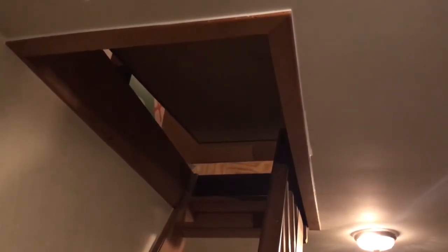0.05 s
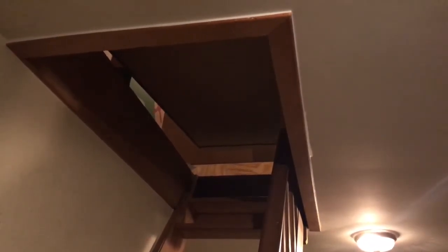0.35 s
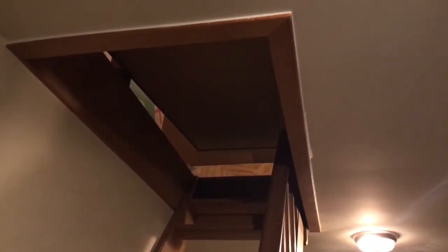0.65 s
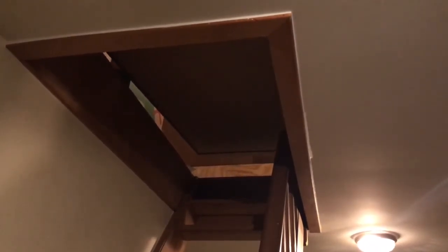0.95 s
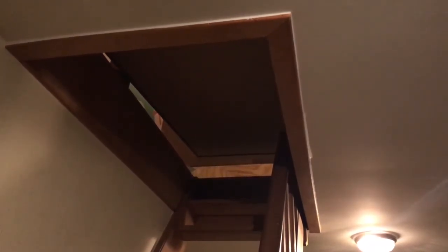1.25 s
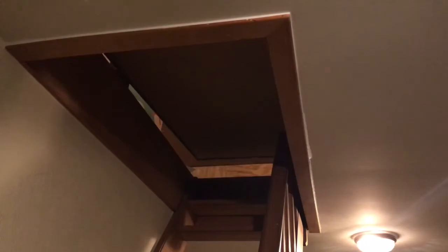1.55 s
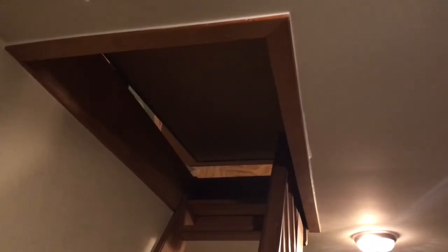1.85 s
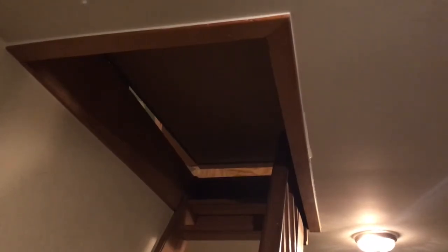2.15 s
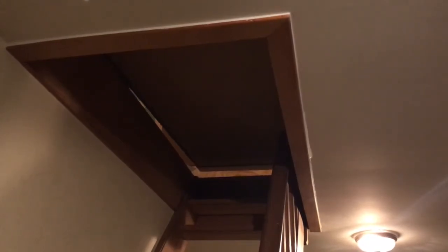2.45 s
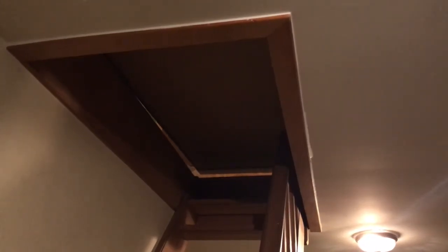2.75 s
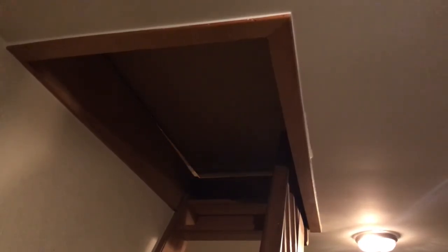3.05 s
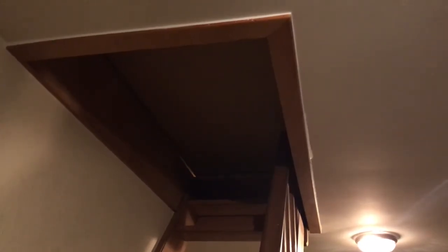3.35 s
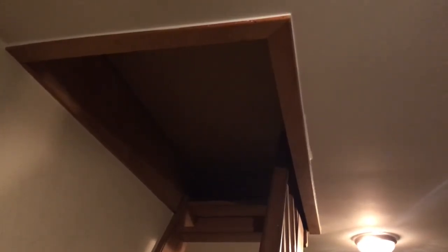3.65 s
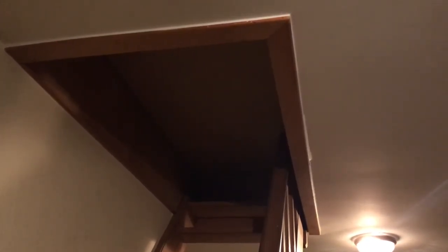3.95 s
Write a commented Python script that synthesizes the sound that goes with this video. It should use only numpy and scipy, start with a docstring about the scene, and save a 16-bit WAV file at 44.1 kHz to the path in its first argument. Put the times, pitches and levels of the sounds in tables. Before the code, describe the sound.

A winch motor hums low with a gear whine throughout, lowering a wooden attic hatch above a small, bare landing. Dry, slightly metallic ticks come about twice a second, clearest at 0.2, 0.7 and 2.1 seconds, with soft rubbing and scrapes. Faint squeaks come near 0.5, 1.7 and 2.6 seconds. From about 3 seconds the winch grows quieter and its ticks duller, over steady house hiss and hum.

```python
"""A low motor hum with a gear whine, and over it a dry tick about twice a second: a winch
slowly lowering a wooden attic hatch, heard at one microphone on the small, bare landing below.
The drive rubs softly, scrapes on each turn and squeaks now and then. As the gap closes the winch
grows quieter and its ticks duller, over the steady hiss and hums of the house."""
import sys
import numpy as np
from scipy import signal
from scipy.fft import rfft, irfft
from scipy.io import wavfile

SR = 44100
rng = np.random.default_rng(int(sys.argv[2]) if len(sys.argv) > 2 else 0)


def to_wav(sig):
    """Store sig (one row per channel, or 1-D mono) as 16-bit WAV at the path in sys.argv[1].

    Samples outside -1..1 are clipped; the rate is SR.
    """
    pcm = np.clip(np.atleast_2d(sig), -1, 1) * 32767
    pcm = np.round(pcm).astype(np.int16)
    wavfile.write(sys.argv[1], SR, pcm.T)  # frames by channels


N = 176400
T = np.arange(N) / SR


def motor(hum_hz=99.9):
    """The motor overhead hums and rumbles while its gear whines; hum and octave swell separately."""
    # level curves of the hum, its octave, the gear whine and the rumble: t/s, level/dB
    hum_curve = [(0.04, -47), (0.88, -46.5), (1.22, -52), (1.39, -47.5), (1.55, -52.5), (1.65, -66),
                 (1.75, -52), (1.92, -51), (2.2, -59), (2.36, -50), (2.68, -53), (3.08, -50), (3.55, -56),
                 (3.97, -59)]
    octave_curve = [(0.03, -50), (0.26, -75.5), (0.41, -48.5), (0.62, -53), (0.73, -61), (0.99, -49.5),
                    (1.18, -55), (1.31, -64), (1.39, -49), (1.75, -63), (1.84, -52), (1.96, -56),
                    (2.2, -56.5), (2.32, -52.5), (2.6, -52.5), (2.65, -66), (3.46, -53.5), (3.75, -67),
                    (3.97, -61.5)]
    whine_curve = [(0.03, -61), (0.86, -58), (1.86, -58.5), (3.79, -64), (3.97, -67.5)]
    rumble_curve = [(0, -56.5), (1.7, -57), (2.6, -59.5), (3.4, -61), (4, -63.5)]
    # tones that swell with the whine, the hum's third harmonic among them: f/Hz, level/dB against the whine
    # curve, unsteadiness/0-1
    whine_tones = [(480.9, 1, 0.15), (499.2, -9, 0.7), (528.7, -16, 0.1), (299.8, -9, 1), (390.8, -17, 0.4)]
    # spectrum of the rumble: f/Hz, relative level/dB
    rumble_colour = [(30, -40), (60, -9), (85, -4.5), (135, -2), (175, -5.5), (230, 0.5), (310, -9),
                     (450, -14.5), (620, -17.5), (800, -31), (2000, -52.5)]
    hum = level(hum_curve) * tone(hum_hz, unsteady=.06, rate_hz=4)
    octave = level(octave_curve) * tone(2 * hum_hz, unsteady=.12, rate_hz=3)
    gear = sum(amp(db) * tone(hz, unsteady, rate_hz=8.7) for hz, db, unsteady in whine_tones)
    rumble = level(rumble_curve) * colour(rng.standard_normal(N), rumble_colour)
    return hum + octave + level(whine_curve) * gear + rumble


def ticks(direct_db=-2.5, treble_hz=8100, dulling_db_per_s=1.3, ping_decay_s=.025):
    """Each tick is a quick run of slips that builds, echoes on the landing and leaves a metallic ping."""
    # ticks: peak t/s, relative level/dB, rise/s, fall/s, ping/dB against that level
    events = [(.213, -57, .007, .0018, -6), (.675, -57.5, .007, .003, -14), (1.189, -60.3, .014, .012, -13),
              (1.712, -66.5, .035, .009, -16), (2.147, -57, .009, .003, -14), (2.609, -64, .009, .014, -10),
              (2.77, -72, .005, .008, -20), (3.078, -67.5, .012, .015, -9), (3.531, -72, .006, .011, -10),
              (3.762, -73, .008, .012, -17)]
    # spectrum of the slips: f/Hz, relative level/dB
    slip_colour = [(900, -11), (2500, 2), (3800, 2), (4800, -3), (6300, 0.5), (7700, -5.5), (9300, 1.5),
                   (10400, -3.5), (11300, 0.5), (15500, -3.5)]
    slips = colour(grit(spread_db=4.5), slip_colour)
    treble = signal.sosfiltfilt(signal.butter(2, treble_hz, "high", fs=SR, output="sos"), slips)
    slips += (amp(-dulling_db_per_s * T) - 1) * treble  # the closing hatch muffles the treble
    force, ring = np.zeros((2, N))
    for peak, db, rise, fall, ping_db in events:
        age = T - peak
        build = -(age / rise) ** 2
        force += amp(db) * np.exp(np.where(age < 0, build, -age / fall))
        ring += amp(db + ping_db) * np.exp(np.where(age < 0, build, -age / ping_decay_s))
    clicks = force * slips
    return amp(direct_db) * clicks + landing(clicks) + ring * band(hz=5650, width_hz=900)


def rubbing(rub_gain_db=4, ring_db=-6):
    """Continuous friction in the drive and a scrape on each turn; both set the mechanism ringing."""
    # friction curve: t/s, relative level/dB
    rub_curve = [(0.03, -76), (0.26, -74), (0.46, -71.5), (0.63, -67), (1.38, -71), (1.77, -69),
                 (3.03, -75.5), (3.24, -79), (3.97, -95)]
    # scrapes: peak t/s, rise/s, fall/s, level/dB
    scrapes = [(.56, 0.096, 0.074, -63), (.75, 0.063, 0.087, -65), (1.22, 0.075, 0.07, -65.5),
               (1.715, 0.11, 0.048, -62.5), (2.17, 0.048, 0.054, -64.5), (2.63, 0.057, 0.093, -69),
               (3.08, 0.056, 0.025, -75.5), (3.59, 0.032, 0.03, -75)]
    # spectra of the friction and the scrapes: f/Hz, relative level/dB
    rub_colour = [(300, -5), (620, 7), (760, 2), (1500, -0.5), (2000, -8), (2900, -6.5), (4100, -7.5),
                  (4850, -17.5), (5450, -10), (7700, -19.5), (9500, -15), (10400, -36), (11500, -17),
                  (15500, -30)]
    scrape_colour = [(300, -6), (650, -0.5), (850, -5), (1200, -1), (1600, -1.5), (1900, -12), (2900, -10),
                     (3500, -23), (6000, -19), (8000, -28.5), (15500, -24)]
    # resonances of the mechanism: f/Hz, relative level/dB
    modes = [(915, 1), (1060, 0), (1154, 3), (1308, -0.5), (1465, 1), (1567, -2)]
    rub_gain = amp(rub_gain_db) * level(rub_curve)
    scrape_gain = np.zeros(N)
    for peak, rise, fall, db in scrapes:
        width = np.where(T < peak, rise, fall)
        scrape_gain += amp(db - 4.2 * ((T - peak) / width) ** 2)
    ring_gain = amp(ring_db) * np.hypot(0.6 * rub_gain, scrape_gain)
    ring = unit(sum(amp(db) * tone(hz, unsteady=2, rate_hz=10) for hz, db in modes))
    friction = echoes(colour(grit(spread_db=1.5), rub_colour))
    scraping = echoes(colour(grit(spread_db=1.5), scrape_colour))
    return rub_gain * friction + scrape_gain * scraping + ring_gain * ring


def squeaks(chatter_hz=100):
    """Now and then the friction catches one resonance, which sings briefly or chatters."""
    # squeaks: peak t/s, half length/s, f/Hz, glide/(Hz per s), noise-to-tone ratio, level/dB
    events = [(.46, .05, 2930, 0, 3, -74), (1.7, .035, 1567, 0, .4, -66),
              (2.638, .028, 1660, -2500, 3, -65), (2.62, .016, 3830, 0, 3, -72),
              (2.73, .02, 2700, 0, .7, -76)]
    sound = np.zeros(N)
    for peak, half, hz, glide, rough, db in events:
        age = T - peak
        swell = amp(db) * np.exp(-(age / half) ** 2 / 2)
        sound += swell * tone(hz + glide * age, rough, chatter_hz)
    return sound


def echoes(x, decay_s=.03, echo_db=-3):
    """The hatch frame and near walls add quick reflections, which give friction a hollow grain."""
    t = np.arange(2048) / SR
    cluster = rng.standard_normal(len(t)) * np.exp(-t / decay_s)
    reflected = signal.fftconvolve(x, cluster / np.linalg.norm(cluster))[:N]
    return unit(x + amp(echo_db) * reflected)


def landing(x, onset_s=.011):
    """The reverberant tail of the bare landing around the microphone; the treble dies first."""
    # room decay: f/Hz, time to fall 60 dB/s
    decay = [(200, 0.43), (1500, 0.5), (6000, 0.37), (15000, 0.16)]
    hz, t, spectrum = signal.stft(rng.standard_normal(SR // 2), SR, nperseg=256)
    spectrum *= amp(-60 * t / read(decay, hz)[:, None])
    tail = signal.istft(spectrum, SR, nperseg=256)[1]
    tail *= np.minimum(np.arange(len(tail)) / SR / onset_s, 1)
    return signal.fftconvolve(x, tail / np.linalg.norm(tail))[:N]


def room_tone(hiss_db=-70, buzz_hz=1000, buzz_db=-92, buzz_fall_db_per_octave=4):
    """Behind the winch: room hiss, steady hums of the house and a very faint high buzz."""
    # house hums: f/Hz, level/dB, unsteadiness/0-1
    house_hums = [(41.15, -64.5, .3), (246.6, -67, 1)]
    # spectrum of the hiss: f/Hz, relative level/dB
    hiss_colour = [(20, -7), (100, 12.5), (400, 4.5), (680, -0.5), (1600, 0.5), (2050, -5), (2700, -3),
                   (4000, -10.5), (5000, -12), (5600, -9.5), (7700, -14), (15500, -15.5)]
    buzz = np.zeros(N)
    for harmonic in range(2, 14):
        gain = np.sqrt(2) * amp(buzz_db - buzz_fall_db_per_octave * np.log2(harmonic / 2))
        buzz += gain * np.cos(2 * np.pi * (harmonic * buzz_hz * T + rng.random()))
    hums = sum(amp(db) * tone(hz, unsteady, rate_hz=5.4) for hz, db, unsteady in house_hums)
    hiss = amp(hiss_db) * colour(rng.standard_normal(N), hiss_colour)
    return hiss + hums + buzz


def amp(db):
    """Decibels to gain."""
    return 10 ** (np.asarray(db) / 20)


def unit(x):
    """Scales to an rms of one."""
    return x / np.sqrt(np.mean(abs(x) ** 2) + 1e-30)


def level(curve):
    """Gain over time from points of t/s, level/dB."""
    return amp(np.interp(T, *np.transpose(curve)))


def read(points, hz):
    """Reads a table on a log-frequency axis."""
    f, value = np.transpose(points)
    return np.interp(np.log(hz + 1), np.log(f + 1), value)


def colour(x, points):
    """Filters by a spectrum and scales to an rms of one."""
    hz = np.fft.rfftfreq(N, 1 / SR)
    return unit(irfft(rfft(x) * amp(read(points, hz)), N))


def band(hz, width_hz):
    """Noise in one resonance."""
    detuning = 2 * (np.fft.rfftfreq(N, 1 / SR) - hz) / width_hz
    return unit(irfft(rfft(rng.standard_normal(N)) / (1 + detuning ** 2), N))


def drift(rate_hz):
    """Random motion up to about the given rate."""
    hz = np.fft.rfftfreq(N, 1 / SR)
    return unit(irfft(rfft(rng.standard_normal(N)) / (1 + (hz / rate_hz) ** 4), N))


def grit(spread_db):
    """Dense tiny slips of uneven strength."""
    return rng.standard_normal(N) * amp(spread_db * drift(rate_hz=400))


def tone(hz, unsteady, rate_hz):
    """A tone whose strength and phase wander."""
    wander = 1 + unsteady * (drift(rate_hz) + 1j * drift(rate_hz)) / np.sqrt(2)
    cycles = np.cumsum(hz * np.ones(N)) / SR + rng.random()
    return unit((wander * np.exp(2j * np.pi * cycles)).real)


def scene():
    """The winch and the house at one microphone below the hatch."""
    return (motor() + rubbing() + squeaks() + ticks() + room_tone())[None]


def record(dry):
    """The recorder's band limit."""
    edge_hz = 15750
    lowpass = signal.firwin(801, edge_hz, window=("kaiser", 9), fs=SR)
    return signal.oaconvolve(dry, lowpass[None], "same")


dry = scene()
out = record(dry)
to_wav(out)
```